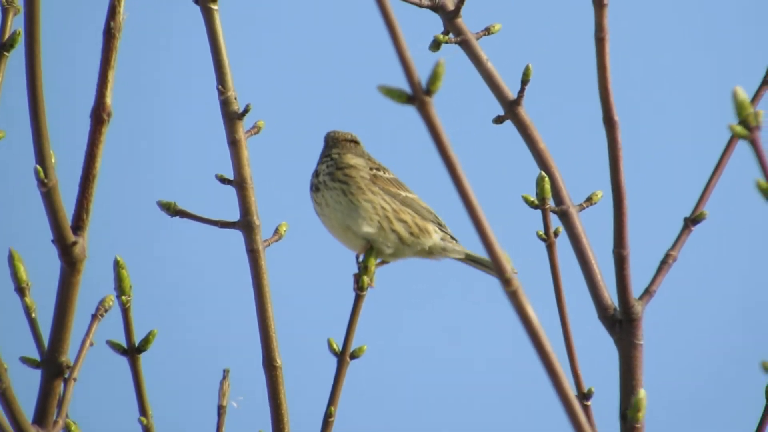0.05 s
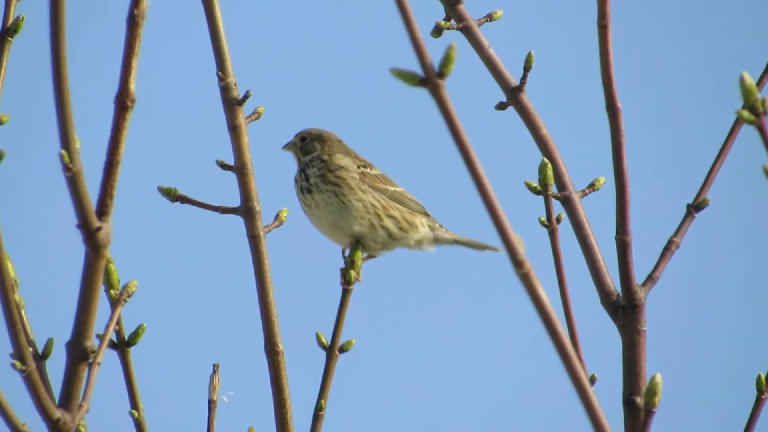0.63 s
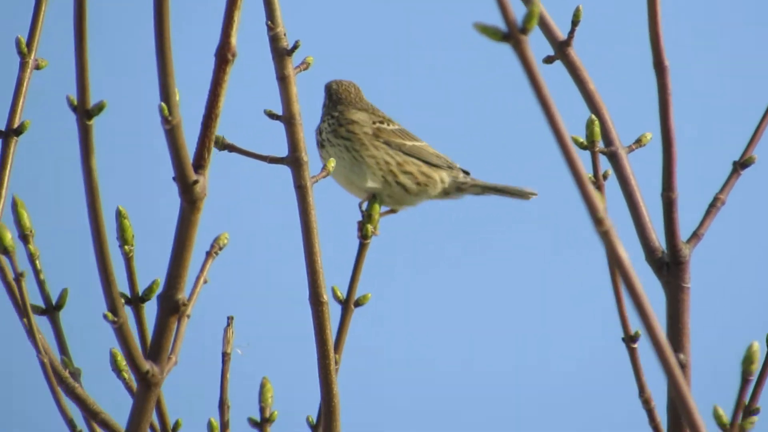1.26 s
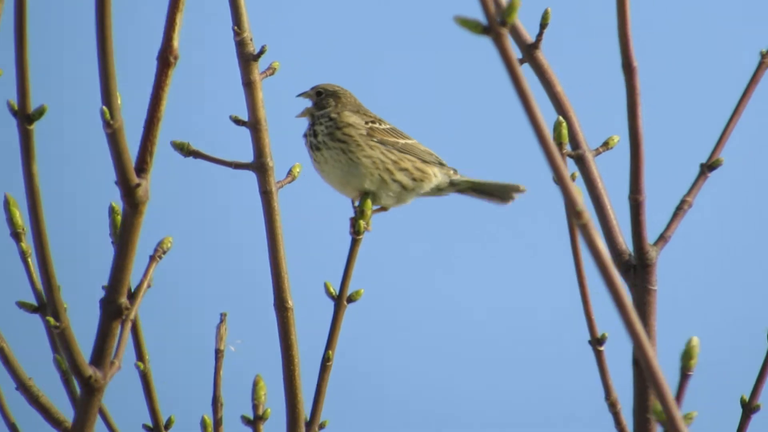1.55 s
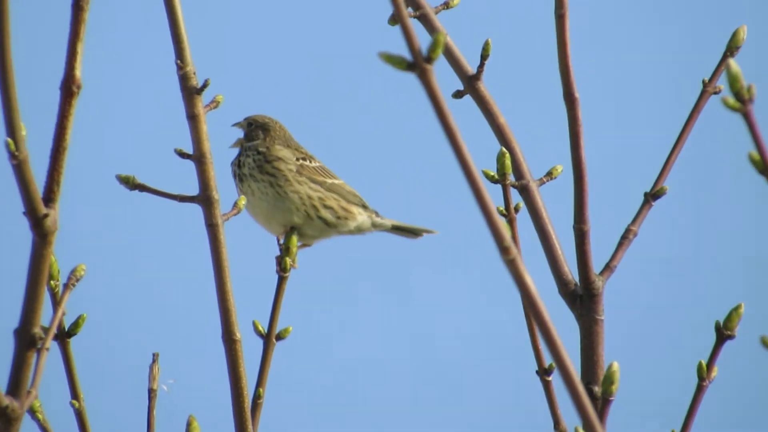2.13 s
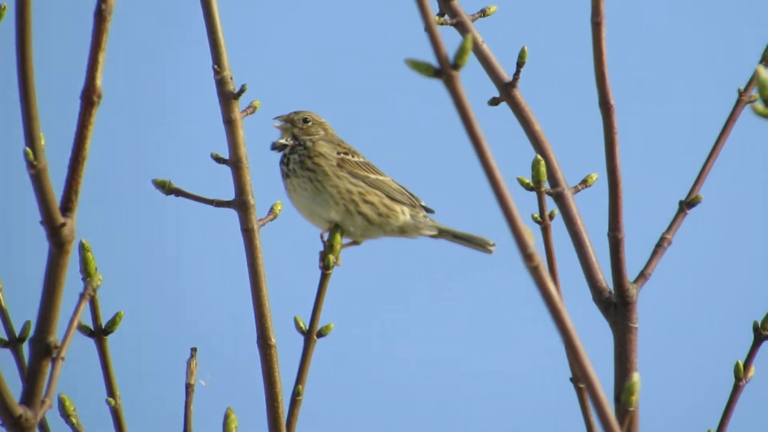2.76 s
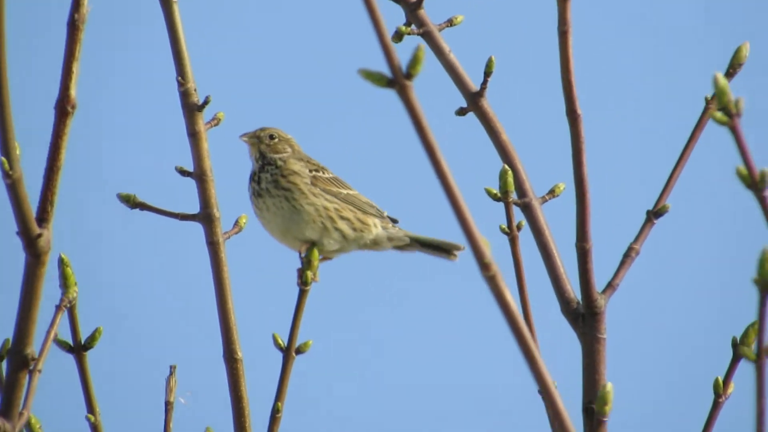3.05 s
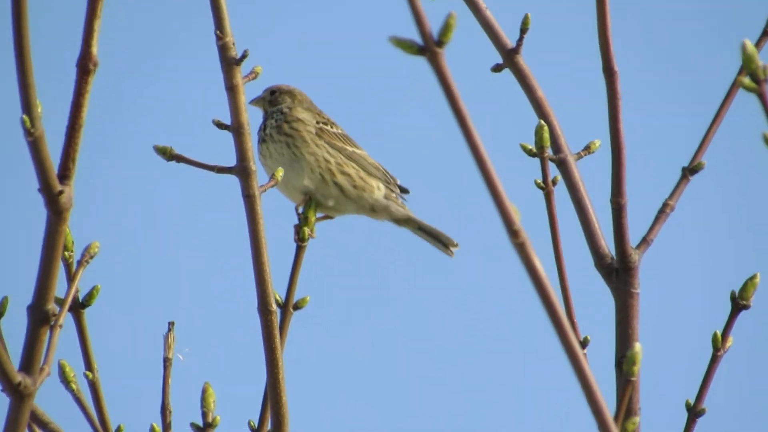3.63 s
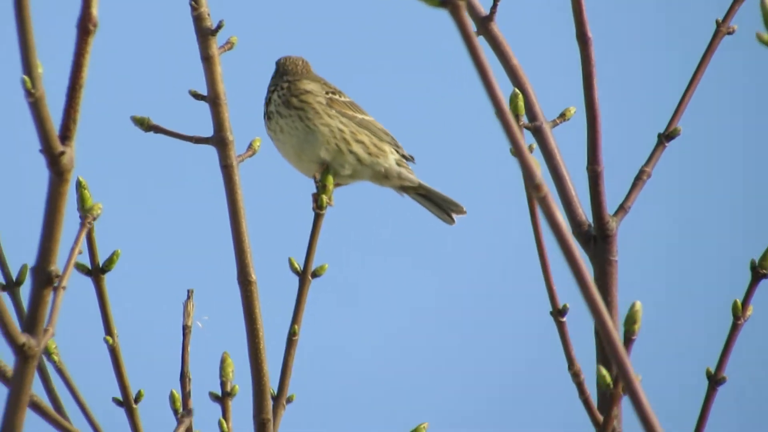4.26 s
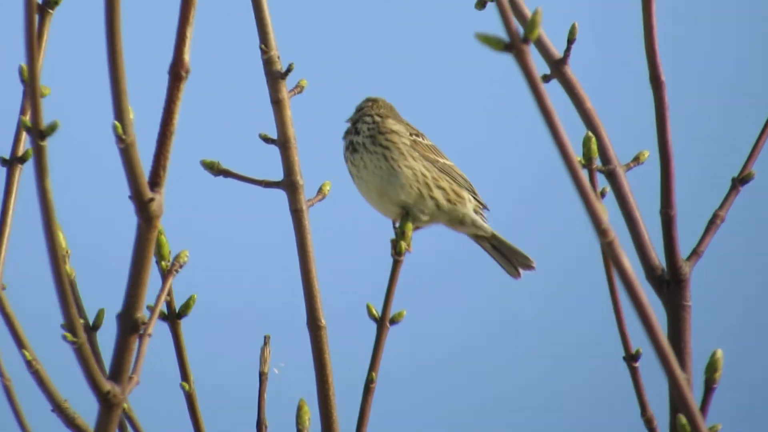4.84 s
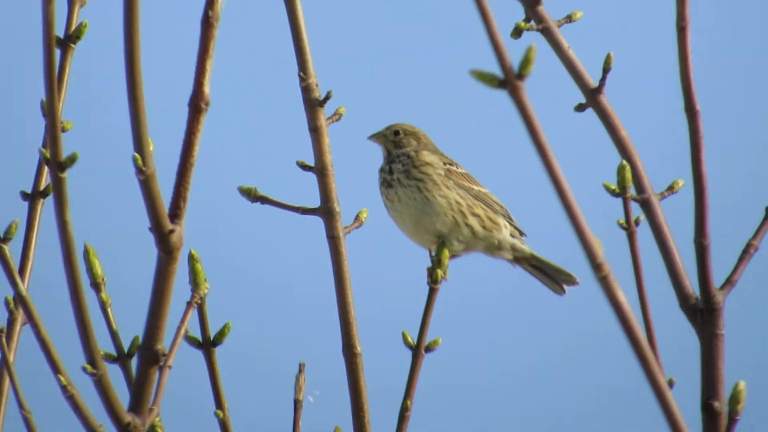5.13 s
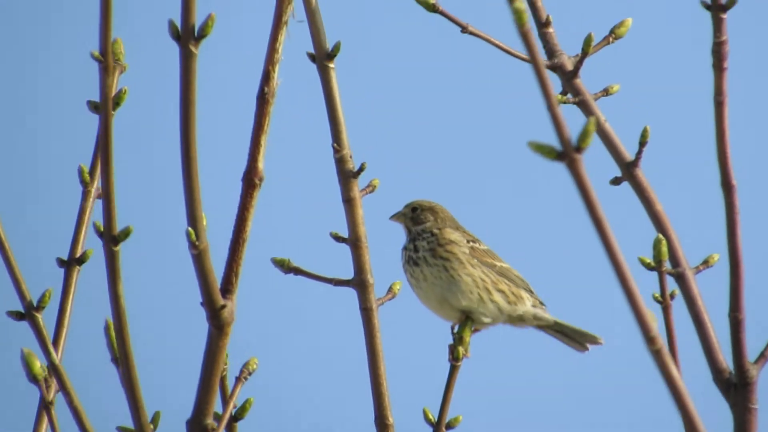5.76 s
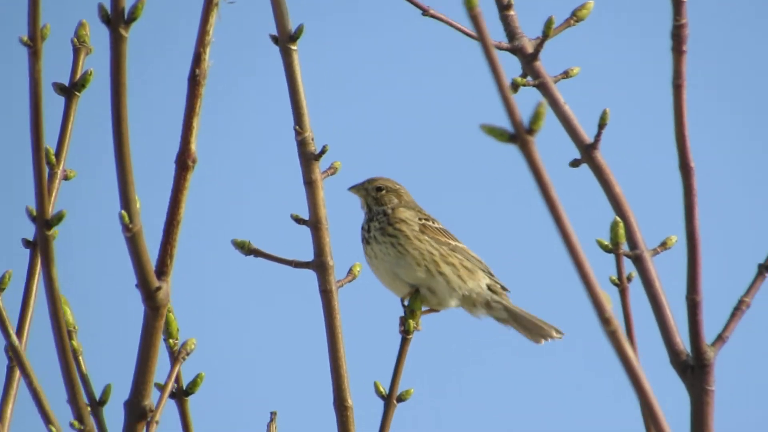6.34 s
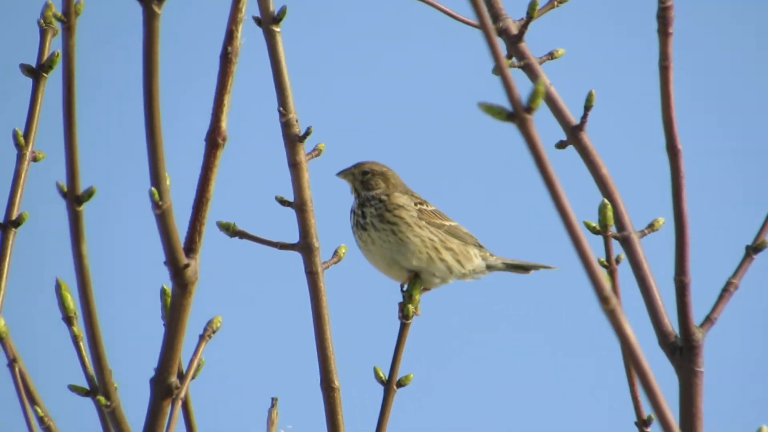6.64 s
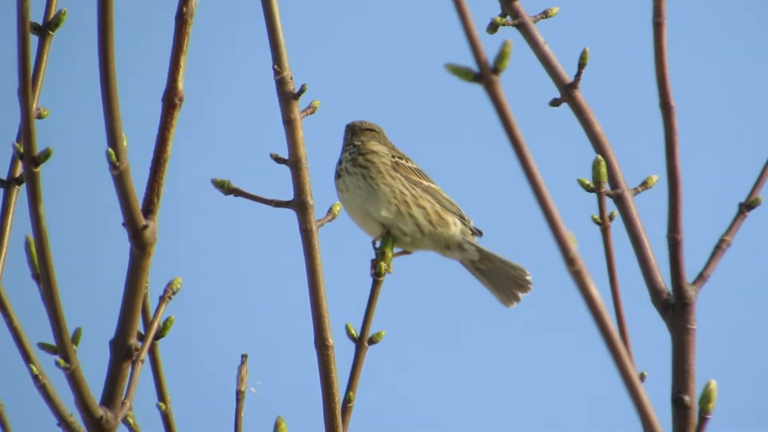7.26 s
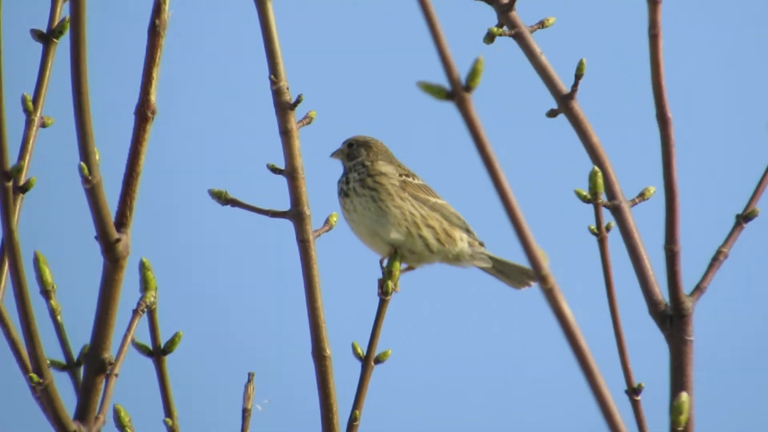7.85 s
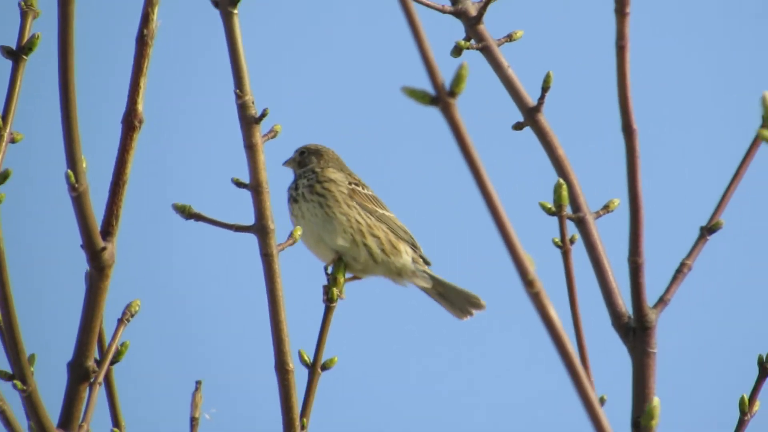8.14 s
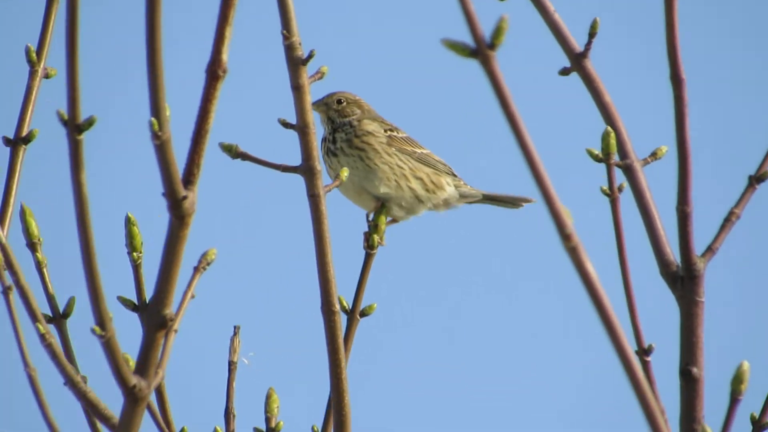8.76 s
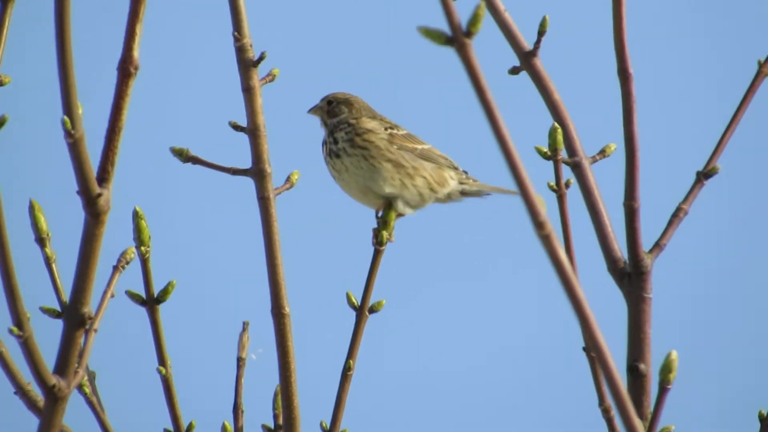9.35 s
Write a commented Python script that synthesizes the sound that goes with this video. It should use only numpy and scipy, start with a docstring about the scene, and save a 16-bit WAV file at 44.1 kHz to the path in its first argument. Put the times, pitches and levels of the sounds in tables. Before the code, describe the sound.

A songbird sings one short phrase of quickening ticks, buzzes and a jangling rattle as a gust buffets the microphone in an open field.

```python
"""A corn bunting sings one jangling phrase from a bush ahead of the microphone: quickening ticks,
buzzes, then a rattle. Its syrinx whistles and flutters, and a far surface returns one late echo.
A gust buffets the two microphone ports in opposite phase; the recorder's gain control ducks
everything and creeps back. Behind are open-field air, a far engine, rustling twigs, far birds
and a thin whine."""
import sys
import numpy as np
from scipy import signal
from scipy.fft import rfft, irfft, next_fast_len
from scipy.io import wavfile
from scipy.ndimage import uniform_filter1d, minimum_filter1d, map_coordinates

SR = 44100
rng = np.random.default_rng(int(sys.argv[2]) if len(sys.argv) > 2 else 0)


def dump(signal):
    """Clip the signal to [-1, 1] and save it as 16-bit WAV at the path in sys.argv[1]."""
    limited = np.clip(np.atleast_2d(signal).T, -1, 1)
    pcm = np.round(limited * 32767).astype(np.int16)
    wavfile.write(sys.argv[1], SR, pcm)


N = 414540  # 9.4 s


def amp(db):
    """Decibels to gain."""
    return 10 ** (np.asarray(db) / 20)


def unit(x):
    """Scale to rms 1."""
    return x / np.sqrt(np.mean(x ** 2) + 1e-20)


def curves(rows):
    """One value per sample for each column after the time."""
    times, *columns = np.transpose(rows)
    return [np.interp(np.arange(N) / SR, times, column) for column in columns]


def phase_of(hz):
    """Running phase of a moving frequency."""
    return 2 * np.pi * np.cumsum(hz) / SR


def wobble(rate, size=N):
    """A smooth random curve, rate knots a second."""
    knots = rng.standard_normal(size // 16 + 8)
    return map_coordinates(knots, [np.arange(size) * rate / SR + 2], mode="mirror")


def filtered(x, response):
    """x times a response of frequency."""
    size = next_fast_len(N + 8192)
    return irfft(rfft(x, size) * response(np.fft.rfftfreq(size, 1 / SR)), size)[..., :N]


def noise(spectrum):
    """Noise of rms 1 coloured by (Hz, dB) points."""
    freqs, db = np.transpose(spectrum)
    colour = lambda hz: amp(np.interp(np.log(hz + 1), np.log(freqs), db))
    return unit(filtered(rng.standard_normal(N), colour))


def band(hz, width):
    """A narrow noise of rms 1 around a steady or moving frequency."""
    phase = phase_of(hz + np.zeros(N))
    return unit(wobble(width) * np.cos(phase) + wobble(width) * np.sin(phase))


def even(x, size):
    """Noise with its slow chance swells levelled out."""
    return x / np.sqrt(np.abs(uniform_filter1d(x ** 2, size=size)) + 0.032)


def add(track, start_s, sound):
    """Mix a sound into a track."""
    part = track[max(0, round(start_s * SR)):][:len(sound)]
    part += sound[:len(part)]


def scatter(x, t60):
    """Diffuse stereo tail from twigs and ground."""
    t = np.arange(SR // 2) / SR
    tail = rng.standard_normal((2, len(t))) * amp(-60 * t / t60) * (1 - np.exp(-t / 0.0031))
    return signal.fftconvolve(x[None], tail / np.linalg.norm(tail[0]), axes=1)[:, :N]


# Noise bands of an engine far from the microphone: centre_hz, width_hz, level_db
ENGINE_BANDS = [(115, 20, -54), (178.4, 24, -51.5), (236.9, 20, -56), (296.4, 24, -61), (554, 36, -59),
                (712.5, 32, -58), (984.5, 110, -60.5), (1311, 160, -64)]
# Its firing tone across the field: time_s, level_db
ENGINE_GROWL = [(0, -47), (1, -49.5), (4.8, -50.5), (6.1, -64.5), (6.9, -48), (7.3, -41.5), (7.75, -45.5),
                (8.1, -50), (9.4, -52)]
def engine(firing_hz=59.2, low_hz=450, follow=0.5):
    """A far engine: its firing tone and low bands swell together under load."""
    growl_db, = curves(ENGINE_GROWL)
    firing = np.sin(phase_of(firing_hz + 0.69 * wobble(1.938)))
    load_db = follow * (growl_db - growl_db.mean())
    bands = sum(amp(db + load_db * (hz < low_hz)) * band(hz, width) for hz, width, db in ENGINE_BANDS)
    return np.sqrt(2) * amp(growl_db) * firing + bands


# Open-field air, alike at both microphone ports: freq_hz, level_db
AIR_COMMON = [(15, -57), (25, -1.5), (54, 4.5), (86, -3.5), (109, 6), (181, -1.5), (450, -11), (709, -9.5),
              (769, -12.5), (978, -12.5), (1150, -18), (3440, -26.5), (3930, -25), (10900, -35),
              (15000, -44.5)]
# The same air, opposite at the two ports: freq_hz, level_db
AIR_OPPOSED = [(15, -31), (25, -28), (81, 3), (106, -3.5), (176, -1.5), (709, -10.5), (879, -14),
               (3540, -27), (3930, -24), (4500, -28), (10600, -31.5), (13500, -36), (15000, -47)]
def field_air():
    """A wide, gently stirring hush."""
    stir = amp(.5 * wobble(3) + .5 * np.array([wobble(14), wobble(14)]))
    mid = amp(-41.5) * noise(AIR_COMMON) * stir[0]
    side = amp(-43.0) * noise(AIR_OPPOSED) * stir[1]
    return np.array([mid + side, mid - side])


# A faint whine, centred between the ports: time_s, pitch_hz
WHINE_PITCH = [(0, 11500), (2.7, 11160), (4.5, 11300), (5.4, 11040), (7.4, 10900), (7.8, 11100),
               (8.3, 10940), (9.4, 11300)]
# Rise and fall of the whole background at the microphone: time_s, gain_db
BACKGROUND_GAIN = [(0, 2.5), (.4, 1.5), (.75, 1.5), (1.09, 3.5), (1.2, -3.5), (1.7, -3), (2.8, -2.5),
                   (3.25, -1.5), (3.9, -1), (4.8, 0.97), (9.4, 0)]
def background():
    """Field air, the engine and a thin wandering whine; the bass leans left."""
    air = field_air()
    whine = amp(-72.5) * band(curves(WHINE_PITCH)[0], width=650)
    lean = lambda hz: amp(np.interp(hz, [250, 500], [1.4, .45]) * np.array([[1], [-1]]))
    return filtered(air + engine() + whine, lean) * amp(curves(BACKGROUND_GAIN)[0])


def hoot(pitch_hz=725):
    """One soft, hoarse call from far across the field."""
    level_db, = curves([(8.38, -86), (8.425, -43), (8.444, -37.5), (8.485, -39), (8.515, -48),
                        (8.62, -64), (8.75, -88)])
    tone = np.sin(phase_of(pitch_hz + 28 * wobble(160)))
    rasp = amp(-7) * band(800, width=460) + amp(-17.0) * band(1350, width=230)
    return amp(level_db) * (tone + rasp)


def overtones(phase, hz, second_db, third_db):
    """Second and third harmonics of a bird's tone, the third only where it will not alias."""
    return amp(second_db) * np.sin(2 * phase) + amp(third_db) * (3 * hz < SR / 2) * np.sin(3 * phase)


def whistles(notes, edge, quaver_hz, ease=0):
    """Quavering tones arc through three pitches; edge softens their ends, ease lingers there."""
    out = np.zeros(N)
    for start_s, length_s, *pitches, db, octave_db in notes:
        u = np.linspace(0, 1, max(8, round(length_s * SR)))
        progress = u - ease * np.sin(2 * np.pi * u) / (2 * np.pi)
        arc = np.polyval(np.polyfit([0, .5, 1], pitches, 2), progress)
        hz = arc + quaver_hz * wobble(717, size=16384)[:len(u)]
        phase = phase_of(hz)
        pressure = np.abs(np.sin(np.pi * u)) ** edge
        tone = np.sin(phase) + overtones(phase, hz, octave_db, third_db=2 * octave_db - 6)
        add(out, start_s, np.sqrt(2) * amp(db) * pressure * tone)
    return out


# Birds far across the field: start_s, length_s, start_hz, middle_hz, end_hz, level_db
FAR_BIRD_CALLS = [(4.73, 0.035, 4440, 4100, 3680, -58), (5.00, 0.027, 3620, 3440, 3230, -54.5),
                  (5.505, 0.017, 4050, 3550, 3150, -51), (5.528, 0.017, 3900, 3520, 3200, -49.5),
                  (5.68, 0.04, 4650, 4550, 4400, -66), (5.75, 0.05, 4380, 4280, 4260, -63),
                  (6.042, .03, 3970, 3650, 3480, -63), (6.307, 0.091, 4740, 4620, 4470, -65),
                  (7.303, 0.049, 3350, 3250, 3140, -60), (7.38, 0.08, 3160, 3130, 3070, -62),
                  (7.695, 0.04, 4700, 4450, 4130, -60), (9.08, .05, 4600, 4470, 4400, -64),
                  (9.258, 0.098, 4550, 4470, 4370, -65)]
def far_birds(octave_db=-22):
    """Distant callers, broken up and blurred on their way to the microphone."""
    calls = whistles([(*call, octave_db) for call in FAR_BIRD_CALLS], edge=0.2, quaver_hz=55)
    calls = calls * amp(3 * wobble(45))
    return calls + amp(-6) * scatter(calls, t60=.4)


# Twigs rustling around the microphone: time_s, level_db
TWIG_SCUFFS = [(.111, -52), (0.472, -50), (2.742, -52.5), (3.221, -60), (4.076, -51.5), (4.143, -55),
               (4.21, -51.5), (4.45, -52), (4.5, -53), (4.78, -50.5), (5.93, -52.5), (6.54, -58.5),
               (7.1, -54.5), (8.155, -59), (9.199, -53.5)]
def twigs(rise_s=0.006, faint_from_s=3.8):
    """Twigs rub in brief dry scuffs with a woody ring; fainter ones fall at random."""
    age = np.arange(SR // 10) / SR / rise_s
    scuff = age * np.exp(1 - age)
    rub = np.zeros(N)
    for time_s, db in TWIG_SCUFFS:
        add(rub, time_s - .007, amp(db) * scuff)
    for when, size in rng.random((45, 2)):
        add(rub, faint_from_s + when * (N / SR - faint_from_s), amp(-65.5 + 8.3 * size) * scuff)
    colour = [(500, 15), (1600, 13.5), (3000, 5.0), (4200, 4), (7000, 3.0), (14000, -15)]
    wood = band(1750, width=420) + band(2750, width=940)
    return rub * (amp(9.5) * np.array([noise(colour), noise(colour)]) + amp(-3.5) * wood)


# Puffs of wind reaching the microphone: peak_s, half_width_s, rumble_db, flutter_db
PUFFS = [(.09, 0.079, -19, -58), (.36, 0.1, -28, -58), (.6, 0.022, -14, -51), (.72, 0.04, -9.5, -45),
         (0.742, 0.011, -5, -12.5), (.89, 0.067, -8.5, -45), (1.149, 0.024, 7.5, -4.5),
         (1.191, 0.036, 2, -2.5), (1.292, 0.05, 0.5, -22), (1.42, 0.052, -7.5, -14.5),
         (1.56, 0.11, -7.5, -14.5), (1.7, 0.036, -3, -4.5), (1.782, 0.035, 1, -2.5),
         (1.88, 0.05, -2.5, -2.5), (2.026, 0.039, 3, -13), (2.115, 0.011, 1.5, -9),
         (2.23, 0.051, -1.5, -8.5), (2.31, 0.075, 3, -10.5), (2.4, 0.061, -2.5, -27),
         (2.596, 0.023, -9, -18), (2.648, 0.018, -9.5, -26), (2.78, 0.13, -17.5, -49),
         (3.03, 0.064, -21.5, -60), (4.27, 0.1, -40, -64), (4.851, 0.011, -20, -54),
         (5.53, 0.025, -20.5, -52), (5.75, 0.064, -17, -49)]
def gusts(roundness=1.22, lulls_db=(-52, -80)):
    """Rumble and flutter levels in dB: each puff swells out of the lull and dies in the same shape."""
    t = np.arange(0, N / SR, .002)
    peak_s, width_s, *levels = np.transpose(PUFFS)[:, :, None]
    puffs = np.exp(-np.abs((t - peak_s) / width_s) ** roundness)
    strengths = [np.linalg.norm(amp(db) * puffs, axis=0) + amp(lull_db)
                 for db, lull_db in zip(levels, lulls_db)]
    return curves(np.transpose([t, *(20 * np.log10(strengths))]))


# Wind right on the microphone, three colours from deep to bright: freq_hz, level_db
WIND_RUMBLE = [(15, -8), (35, 1.5), (80, 6), (150, -3), (220, -15.5), (400, -42), (800, -93)]
WIND_FLUTTER = [(90, -69), (180, 9.5), (280, -0.5), (400, -11.5), (600, -29), (900, -52), (1500, -65),
                (4000, -82)]
WIND_ROAR = [(250, -27), (420, 12), (540, 15), (750, 2), (1100, -37), (2500, -45), (6000, -60)]
def eddies(roar_growth=4.1):
    """Turbulent pressure; the roar grows faster than the flutter, so strong gusts are brighter."""
    rumble_db, flutter_db = gusts()
    roar_db = -7 + roar_growth * flutter_db
    lumps = amp(3 * wobble(90))
    rumble = amp(rumble_db) * even(noise(WIND_RUMBLE), size=2400)
    flutter = amp(flutter_db) * even(lumps * noise(WIND_FLUTTER), size=1600)
    roar = amp(roar_db) * even(lumps * noise(WIND_ROAR), size=1600)
    return rumble + flutter + roar


# Hard slaps of wind on the microphone ports: peak_s, level_db, pitch_hz, crackle_db
WIND_SLAPS = [(0.699, -4.5, 79, -55), (0.744, 5.5, 90, -9), (1.0989, 1.5, 150, -1), (1.1289, 15.5, 83, -7),
              (1.176, 1, 280, -30), (1.494, -3.5, 230, -55), (1.555, 2, 171, -55), (1.62, 13, 119, -3.5),
              (1.671, 10.5, 149, -55), (1.76, 6, 180, -16), (1.772, 6, 210, -55), (1.785, 9, 267, -48),
              (1.81, 5, 249, -55), (1.873, 9, 192, -55), (1.924, 10, 85.4, -12.5), (2.031, 9.5, 179, -55),
              (2.165, 11.5, 119, -17), (2.393, 5, 96.5, -22), (2.424, 9, 134, -40), (2.659, -5.5, 176, -55),
              (5.75, -1, 99, -65)]
def wind(overload_db=11.5, crackle_s=0.0003, snap_db=12):
    """Eddies push the two ports in opposite directions; hard slaps overload them and crackle."""
    push = eddies()
    bursts, snaps = np.zeros((2, N))
    t = np.arange(-SR // 40, SR // 40) / SR
    for peak_s, db, hz, crackle_db in WIND_SLAPS:
        spread = (np.pi * hz * t) ** 2
        add(push, peak_s + t[0], -amp(db) * (1 - 2 * spread) * np.exp(-spread))
        add(bursts, peak_s + t[0], amp(crackle_db) * np.exp(-np.abs(t) / crackle_s))
        add(snaps, peak_s, [amp(crackle_db + snap_db)])  # the sharp edge at a crackle's heart
    push = push / (1 + np.abs(push / amp(overload_db)) ** 6) ** (1 / 6)  # soft clipping
    cracks = np.array([snaps, *(bursts * rng.standard_normal((2, N)))])
    shared_snap, *port_crackle = filtered(cracks, lambda hz: 1 / np.sqrt(1 + hz / 350))
    opposed_ports = amp([[1.2], [-1.5]]) * [[1], [-1]]
    return (push + shared_snap) * opposed_ports + amp(-9) * np.array(port_crackle)


def varied(notes, pitch_share=0.014, level_db=1):
    """Each repeat of a note lands a little off in pitch and level."""
    for start_s, length_s, *hz, db in notes:
        sharp, soft = rng.standard_normal(2)
        yield start_s, length_s, *(np.array(hz) * (1 + pitch_share * sharp)), db - level_db * soft


# The bunting opens, from the bush ahead: start_s, sweep_s, top_hz, sweep_db, chip_delay_s, chip_db
OPENING_TICKS = [(0.526, 0.04, 5180, -47, 0.067, -52), (0.833, 0.049, 5370, -40, 0.06, -40.5),
                 (1.066, 0.035, 5880, -31, 0.033, -33), (1.215, 0.045, 5850, -37, 0.054, -33)]
def ticks(end_hz=3750, bow_hz=232, chip_hz=(3930, 4290, 4600)):
    """Each tick is a bowed sweep down, then two rising chips, the first shorter and softer."""
    for start_s, sweep_s, top_hz, db, delay_s, chip_db in OPENING_TICKS:
        yield start_s, sweep_s, top_hz, (top_hz + end_hz) / 2 - bow_hz, end_hz, db
        first = (start_s + delay_s, 0.0075, *chip_hz, chip_db - 2)
        second = (start_s + delay_s + 0.0115, 0.016, *chip_hz, chip_db)
        yield from varied([first, second])


# Trills from the bush:
# start_s, until_s, period_s, note_s, start_hz, middle_hz, end_hz, level_db, swell_db, sag_hz
SONG_TRILLS = [(1.4375, 1.52, 0.019, 0.007, 5450, 5350, 5550, -35.5, 7, 200),
               (1.432, 1.535, 0.0194, 0.0045, 5500, 5200, 4450, -40.5, 6, -100),
               (2.2067, 2.275, 0.0104, 0.009, 5240, 5600, 4850, -36, 8, 253)]
def trills():
    """One note repeated evenly, swelling and drifting in pitch from first to last."""
    for start_s, until_s, period_s, note_s, *hz, db, swell_db, sag_hz in SONG_TRILLS:
        times = np.arange(start_s, until_s, period_s)
        for when, u in zip(times, np.linspace(-.5, .5, len(times))):
            yield when, note_s, *(np.array(hz) - sag_hz * u), db + swell_db * u


# Clinks from the bush, late in the phrase: start_s, top_hz, flick_db, held_s, held_hz, held_db
SONG_CLINKS = [(2.329, 7000, -36, 0.0053, 5400, -31), (2.378, 6600, -45, 0.0059, 5400, -32),
               (2.392, 6700, -36, 0.0072, 5500, -32), (2.419, 7340, -36, 0.0076, 5450, -35),
               (2.458, 7400, -34, 0.0066, 4970, -30.5), (2.802, 6200, -36.5, 0.016, 4860, -33)]
def clinks(flick_s=0.0046, middle_hz=5500, end_hz=5000, lift_hz=180):
    """A steep flick down, then at once a held note that lifts at its end."""
    for start_s, top_hz, flick_db, held_s, hz, db in SONG_CLINKS:
        yield start_s, flick_s, top_hz, middle_hz, end_hz, flick_db
        yield start_s + flick_s, held_s, hz, hz, hz + lift_hz, db


# The closing rattle from the bush: start_s, top_hz, bottom_hz, level_db
CLOSING_RATTLE = [(2.507, 8040, 5250, -36), (2.541, 8200, 5400, -35), (2.5753, 8000, 5320, -32.5),
                  (2.611, 8100, 5260, -34.5), (2.648, 8180, 5430, -34.5)]
def rattle(plunge_s=.0108, middle_hz=7070, ring_at_s=0.0065, ring_s=0.0051, lift_hz=180, octave_db=-29):
    """Each note plunges, then hooks upward in a tiny ring."""
    for start_s, top_hz, bottom_hz, db in CLOSING_RATTLE:
        yield start_s, plunge_s, top_hz, middle_hz, bottom_hz, db, octave_db
        yield start_s + ring_at_s, ring_s, bottom_hz, bottom_hz, bottom_hz + lift_hz, db - 1.5, octave_db


# Buzzes from the bush: start_s, length_s, start_hz, end_hz, level_db, swell_db, flutter_hz,
# swing_hz, throb_share, rough_share, second_harmonic_db, third_harmonic_db
SONG_BUZZES = [ (1.437, 0.105, 5470, 5300, -46, 12, 260, 426, 0.2, 0.46, -24, -43),
               (1.54, 0.05, 5310, 4950, -46, -3, 310, 380, .5, .6, -28, -46),
               (1.81, .021, 7400, 6700, -47, 2, 260, 460, 0.7, .6, -26, -40),
               (1.83, 0.077, 6000, 6620, -43, -15, 390, 580, 0, 0.2, -24, -40),
               (1.968, .04, 5100, 4950, -41.5, -1, 93, 200, 0.6, .55, -30, -40),
               (1.969, 0.047, 6300, 6560, -44, 0, 91, 620, 0.2, 0.4, -15, -40),
               (2.072, 0.096, 6340, 6560, -44, 10, 350, 775, 0, 0.44, -22, -40)]
def buzzes(edge=0.18, lead_rad=1.0, rasp_hz=380):
    """The other side of the syrinx flutters, swinging pitch and loudness together."""
    out = np.zeros(N)
    for (start_s, length_s, start_hz, end_hz, db, swell_db, flutter_hz,
         swing_hz, throb, rough, second_db, third_db) in SONG_BUZZES:
        u = np.linspace(0, 1, round(length_s * SR))
        drift, jitter, shimmer = [wobble(460, size=8192)[:len(u)] for _ in range(3)]
        flutter = phase_of(flutter_hz * (1 + rough * drift))
        rasp = rough * rasp_hz * wobble(2200, size=8192)[:len(u)]
        hz = start_hz + (end_hz - start_hz) * u + swing_hz * (np.sin(flutter) + rough * jitter) + rasp
        phase = phase_of(hz)
        beat = unit((1 + throb * np.sin(flutter + lead_rad)) * amp(5.4 * rough * shimmer))
        harsh = 1 - np.sin(flutter)  # overtones break out at the bottom of each swing
        tone = beat * np.sin(phase) + harsh * overtones(phase, hz, second_db, third_db)
        pressure = np.abs(np.sin(np.pi * u)) ** edge * amp(db + swell_db * (u - .5))
        add(out, start_s, np.sqrt(2) * pressure * tone)
    return out


# The long low buzz from the bush, mid-phrase: time_s, pitch_hz, level_db
LOW_BUZZ = [(1.632, 4380, -55), (1.637, 4360, -39), (1.668, 4325, -37.5), (1.684, 4415, -38.5),
            (1.705, 4455, -35), (1.725, 4395, -33.5), (1.744, 4420, -33), (1.748, 4420, -55)]
def low_buzz(flutter_hz=364, swing_hz=373, throb=0.38, lead_rad=0.55, rough=0.082):
    """A fast, nearly regular flutter on a low note whose pitch wavers as it swells."""
    times, pitch_hz, db = np.transpose(LOW_BUZZ)
    t = np.arange(times[0], times[-1], 1 / SR)
    drift, jitter, shimmer = [wobble(404, size=8192)[:len(t)] for _ in range(3)]
    flutter = phase_of(flutter_hz * (1 + .3 * rough * drift))
    hz = np.interp(t, times, pitch_hz) + swing_hz * (np.sin(flutter) + rough * jitter)
    phase = phase_of(hz)
    beat = unit((1 + throb * np.sin(flutter + lead_rad)) * amp(shimmer))
    harsh = 1 - np.sin(flutter)
    tone = beat * np.sin(phase) + harsh * overtones(phase, hz, second_db=-14, third_db=-22)
    out = np.zeros(N)
    add(out, times[0], np.sqrt(2) * amp(np.interp(t, times, db)) * tone)
    return out


# Slurred whistles from the bush: start_s, length_s, start_hz, middle_hz, end_hz, level_db, octave_db
SONG_SLURS = [(1.119, 0.037, 5600, 4480, 3950, -49, -28), (1.359, 0.018, 5460, 5700, 5600, -41.5, -28),
              (1.4385, 0.0052, 5660, 5900, 5730, -35.5, -19), (1.537, 0.044, 5330, 5420, 5280, -31.5, -32),
              (1.573, 0.027, 5220, 5020, 4660, -38, -29), (1.59, 0.036, 4100, 3900, 3860, -42.5, -5),
              (1.626, 0.0048, 4200, 5800, 5840, -35, -18), (1.782, 0.004, 5300, 5830, 6000, -34, -24),
              (1.79, 0.02, 5700, 6950, 7800, -39, -19), (1.848, 0.042, 5680, 5600, 5270, -37, -35),
              (2.03, 0.03, 5530, 5560, 5470, -39.5, -26), (2.035, 0.023, 6150, 6400, 6400, -49, -22),
              (2.108, 0.023, 5370, 5520, 5300, -46, -28), (2.297, 0.029, 4070, 4130, 4100, -36.5, -9),
              (2.347, 0.0079, 5150, 5500, 5170, -34, -28), (2.359, 0.01, 5040, 5350, 5600, -32.5, -31),
              (2.424, 0.03, 5420, 4480, 4420, -34.5, -34), (2.754, 0.021, 4650, 4380, 4770, -39, -12)]
# The beak's colour, before the song crosses the field: freq_hz, gain_db
BEAK_COLOUR = [(3500, -3), (7500, 1), (8050, -9), (8450, -9), (8900, -16), (9600, -2), (11000, -5),
               (12500, -1), (13700, 7), (14700, -4)]
def phrase(octave_db=-27):
    """Whistled notes and buzzes leave the syrinx through the beak."""
    opening = whistles([(*note, octave_db) for note in ticks()], edge=.9, quaver_hz=110, ease=.1)
    jangle_notes = [(*note, octave_db) for note in varied([*trills(), *clinks()])]
    jangle = whistles(jangle_notes, edge=.7, quaver_hz=105)
    slurs = whistles(SONG_SLURS, edge=0.25, quaver_hz=40)
    closing = whistles(rattle(), edge=0.91, quaver_hz=100, ease=0.8)
    shimmer = amp(0.52 * wobble(440))
    song = (opening + jangle + slurs + closing) * shimmer + buzzes() + low_buzz()
    return filtered(song, lambda hz: amp(np.interp(hz, *np.transpose(BEAK_COLOUR))))


# Song thrown at a far surface as the bird turns its head: sung_s, gain_db
HEAD_TURNS = [(.85, 2), (1.07, -15), (1.22, 3), (1.31, 2), (1.5, 3), (1.72, 0), (2.2, 2), (2.45, -14),
              (2.63, -2), (2.8, -5)]
def bunting(echo_s=.0755):
    """The song arrives straight ahead, then once more from a far surface, duller and from the left."""
    song = phrase()
    thrown = song * amp(curves(HEAD_TURNS)[0])
    dulling = lambda hz: amp(np.interp(hz, [4400, 5600, 7500], [-8, -12, -15]))
    echo = filtered(thrown, lambda hz: dulling(hz) * np.exp(-2j * np.pi * hz * echo_s))
    bush = amp(-8.5) * scatter(song, t60=0.074)  # nearby twigs smear every note a little
    tail = amp(-10.0) * scatter(song, t60=0.33)
    return song + echo * amp([[1.8], [-2.2]]) + bush + tail


def scene():
    """Everything at the two microphone ports."""
    return bunting() + far_birds() + hoot() + wind() + background() + twigs()


def gain_control(x, ceiling=0.97, hold_s=0.17, recover_per_s=0.31, window=256):
    """A peak over the ceiling pulls the gain down just ahead of it; the gain holds, then climbs back."""
    needed = ceiling / np.maximum(np.abs(x).max(axis=0), ceiling)
    ahead = minimum_filter1d(needed, size=window)
    hold = round(hold_s * SR)
    held = minimum_filter1d(ahead, size=hold, origin=(hold - 1) // 2)
    climb = recover_per_s * np.arange(N) / SR
    gain = np.minimum.accumulate(held - climb) + climb
    return x * uniform_filter1d(gain, size=window)


# Narrow holes in the recorder's response: centre_hz, width_hz, depth_db
RECORDER_NOTCHES = [(3970, 296, -16), (8030, 180, -25)]
def record(dry, top_hz=14700):
    """The recorder: gain control, two narrow notches and a steep band limit."""
    def response(hz):
        notches = [1 - (1 - amp(db)) / (1 + ((hz - centre) / (width / 2)) ** 2)
                   for centre, width, db in RECORDER_NOTCHES]
        return np.prod(notches, axis=0) / np.sqrt(1 + (hz / top_hz) ** 120)
    return filtered(gain_control(dry), response)


dry = scene()
out = record(dry)
dump(out)
```